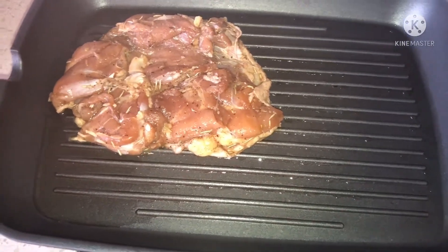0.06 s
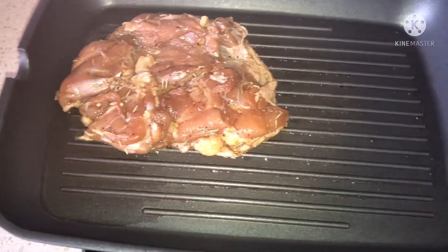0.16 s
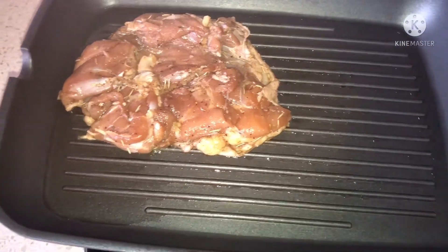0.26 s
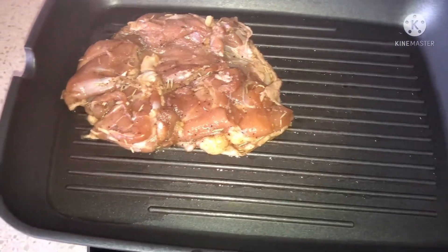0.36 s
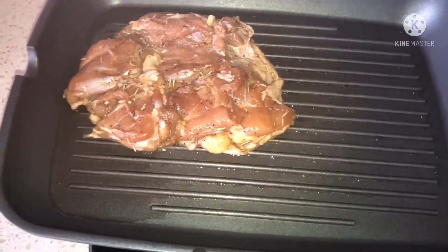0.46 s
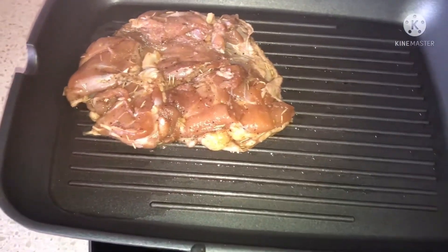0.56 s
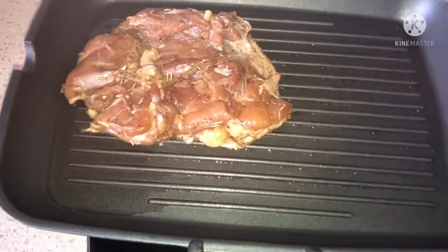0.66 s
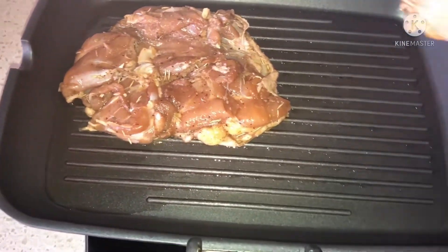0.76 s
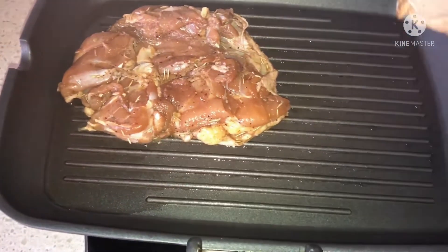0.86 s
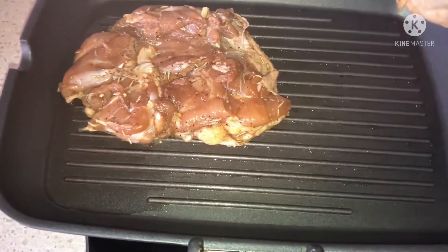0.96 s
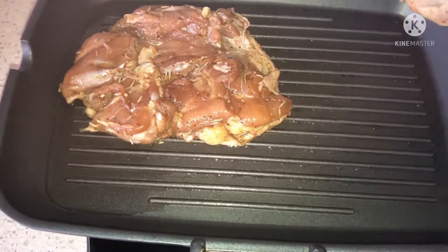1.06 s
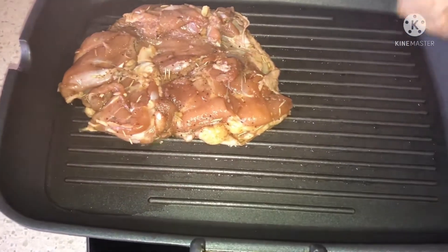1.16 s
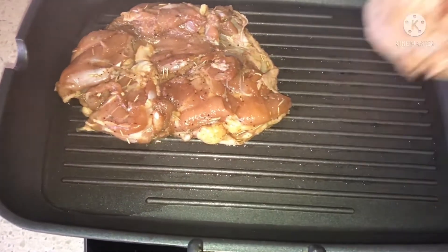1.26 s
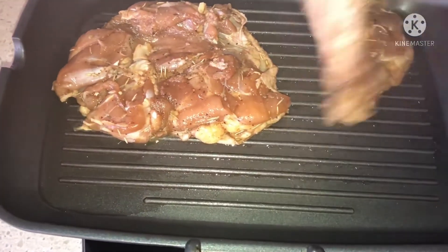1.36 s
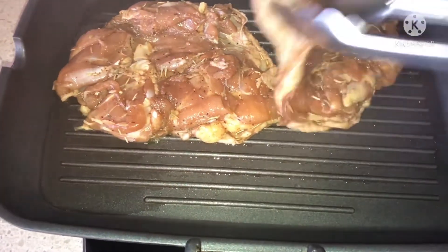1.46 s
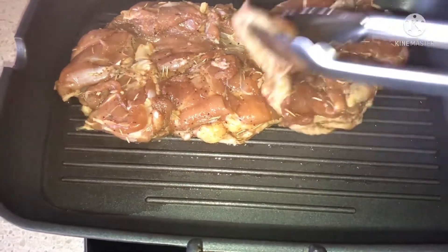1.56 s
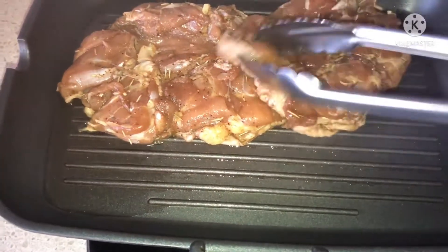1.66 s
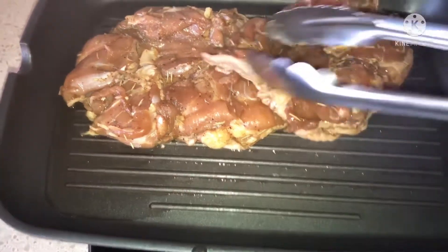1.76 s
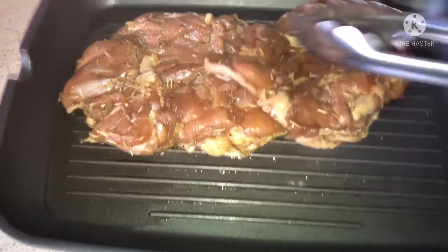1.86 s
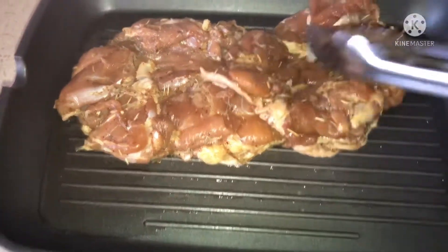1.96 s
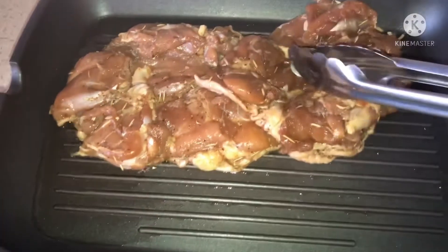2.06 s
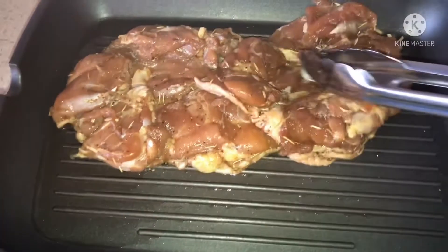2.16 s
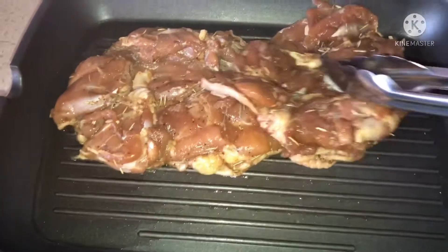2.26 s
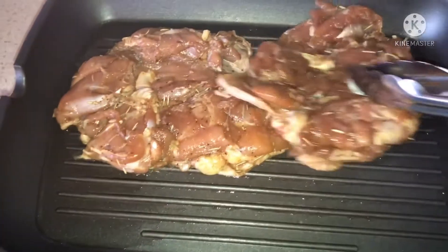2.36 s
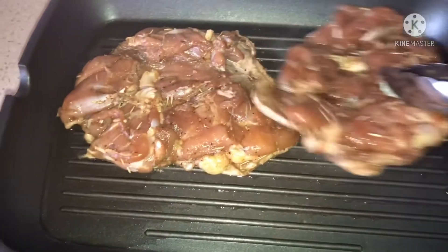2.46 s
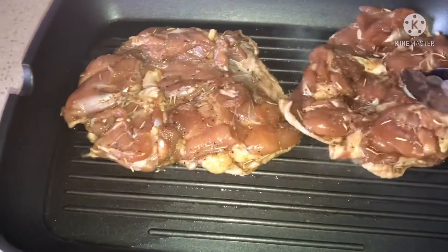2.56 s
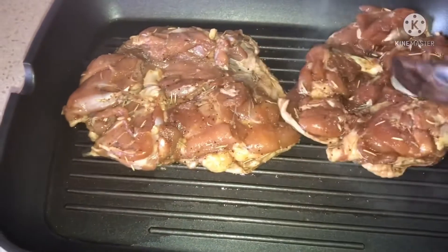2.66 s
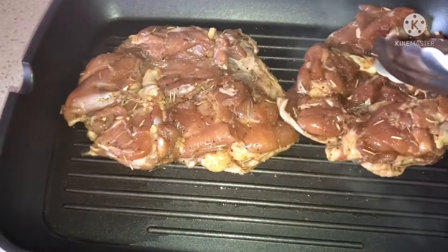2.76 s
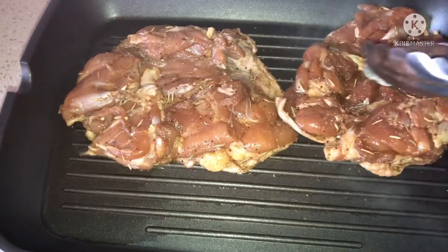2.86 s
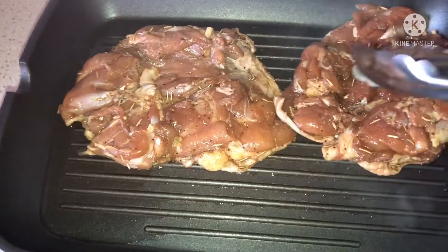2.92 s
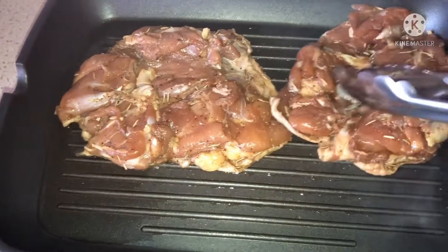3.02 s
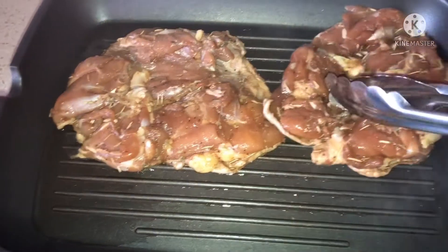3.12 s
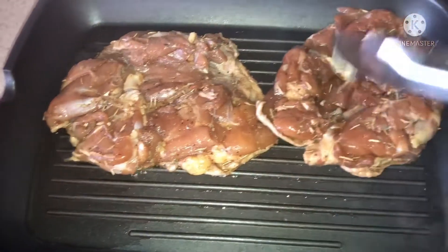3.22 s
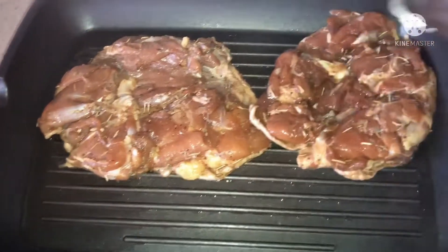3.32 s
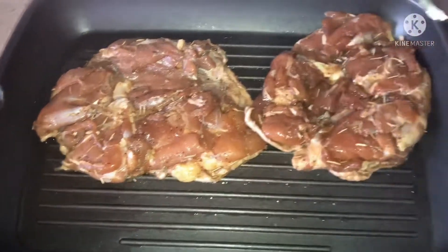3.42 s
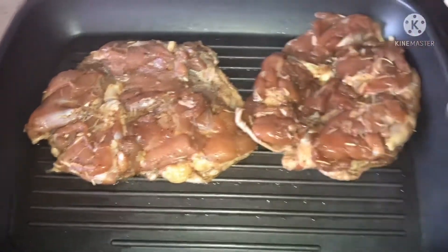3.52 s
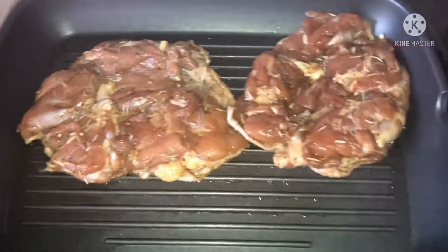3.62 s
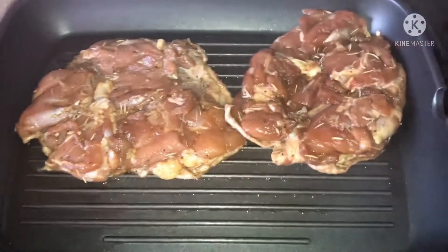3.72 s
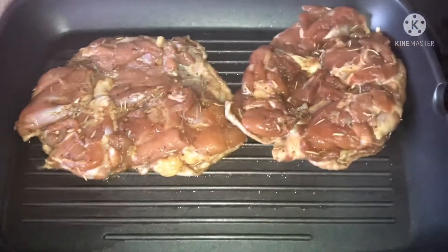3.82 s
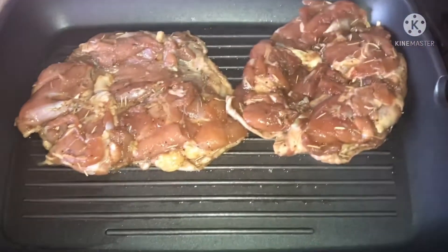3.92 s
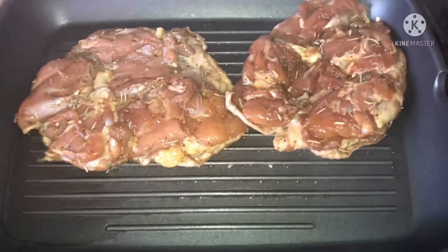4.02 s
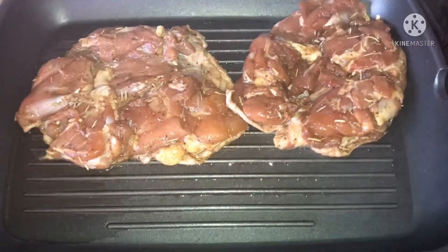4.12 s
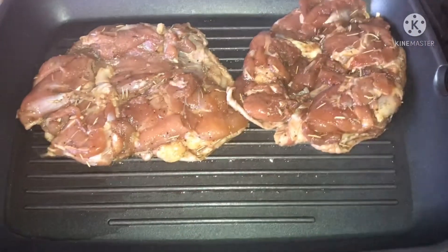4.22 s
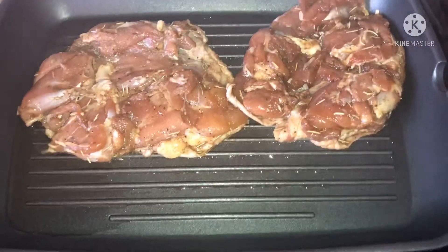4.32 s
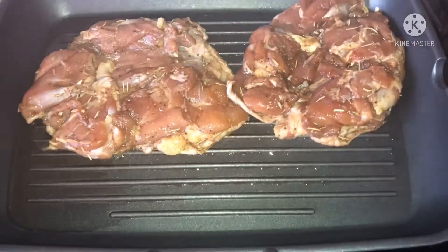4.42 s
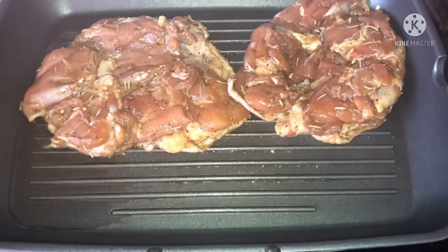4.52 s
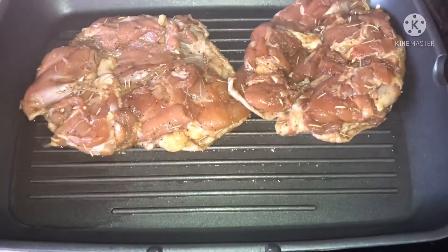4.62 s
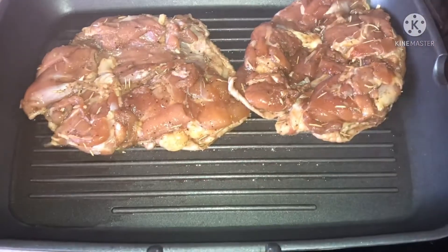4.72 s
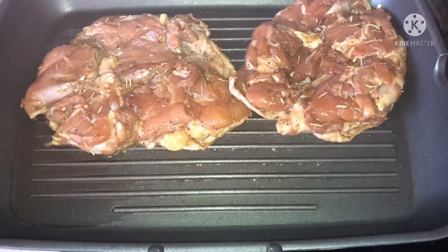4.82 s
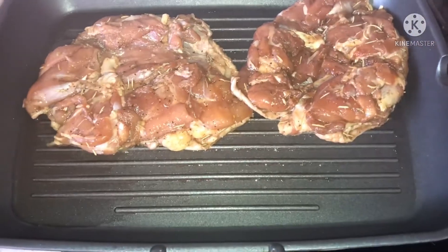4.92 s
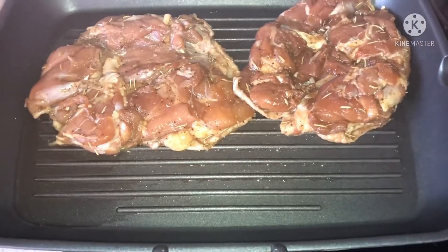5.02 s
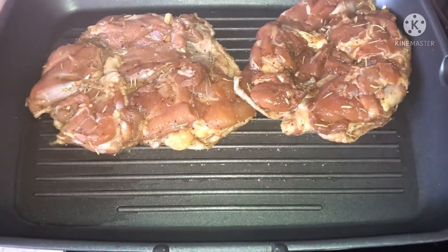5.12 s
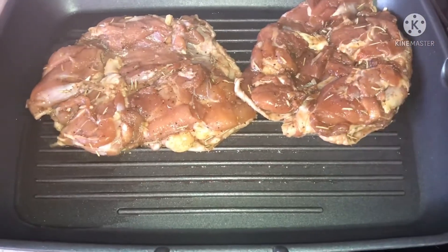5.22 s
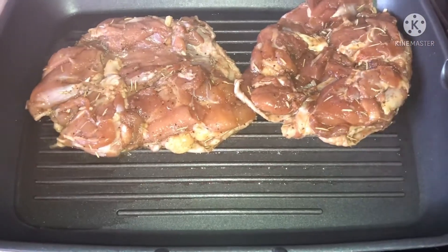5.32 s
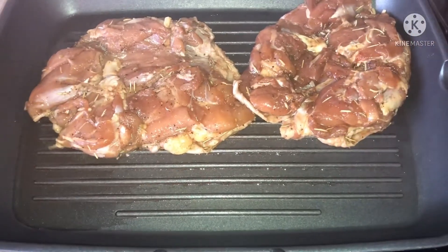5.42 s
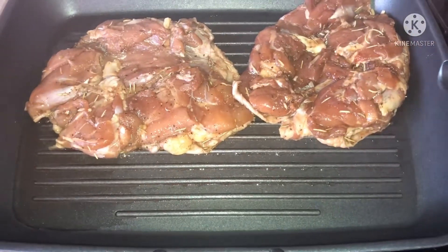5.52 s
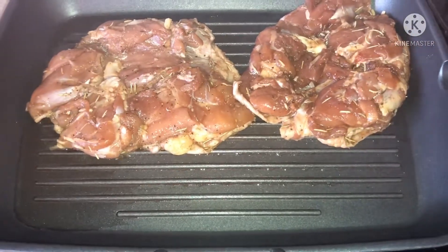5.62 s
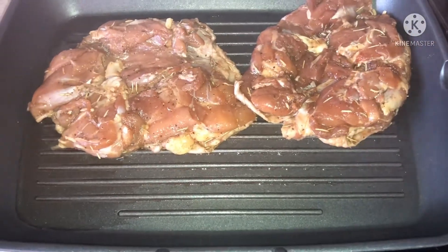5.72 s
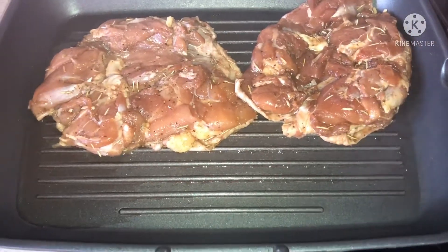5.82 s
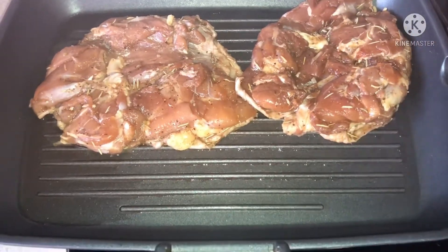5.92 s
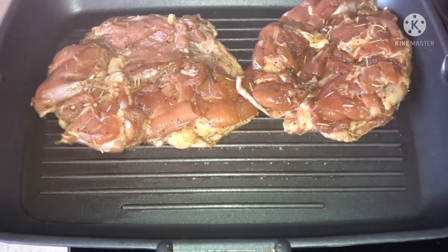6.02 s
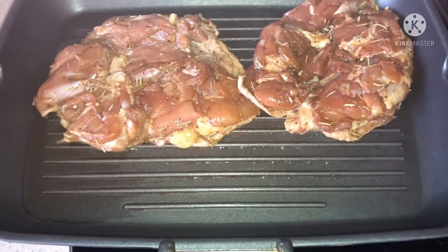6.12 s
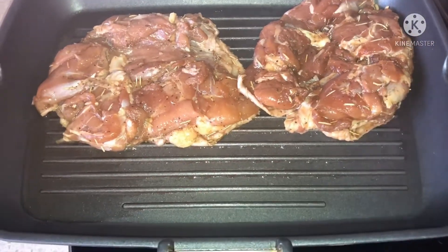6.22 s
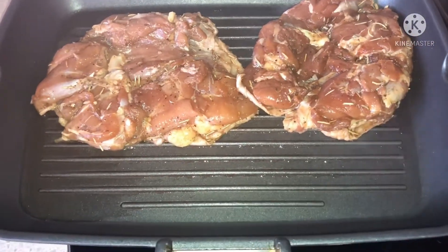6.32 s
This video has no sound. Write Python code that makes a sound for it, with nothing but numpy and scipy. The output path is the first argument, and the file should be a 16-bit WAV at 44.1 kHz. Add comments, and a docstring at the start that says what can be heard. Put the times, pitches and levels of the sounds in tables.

```python
"""Sparse, sharp crackles over a fine hiss: one piece of chicken frying on a ridged grill pan in a kitchen,
close to a single microphone, with a fan rumbling behind. At 1.3 s a wet piece is laid beside it, then
spread out: tiny steam bubbles fizz at its rim, larger ones boil underneath, and both pan and hollows ring.
Oil spits now and then as short noise cracks; a limiter ducks for an instant after the hardest spits."""
import sys
import numpy as np
from scipy import signal
from scipy.io import wavfile
from scipy.ndimage import uniform_filter1d, minimum_filter1d

SR = 44100
rng = np.random.default_rng(int(sys.argv[2]) if len(sys.argv) > 2 else 0)


def persist_wave(psi):
    """Save psi, clipped to +-1, as 16-bit WAV."""
    counts = np.round(np.clip(psi, -1, 1) * 32767).astype(np.int16)
    wavfile.write(sys.argv[1], SR, np.atleast_2d(counts).T)


N = 281358
TIME = np.arange(N) / SR  # s

# Kitchen air with a running fan: pitch_hz [Hz], density_db [dB per Hz]
AIR_COLOUR = [(20, -29), (40, -18), (58, -1.5), (75, 0.5), (95, -4.5), (120, 0), (162, -1.5), (195, -9),
              (240, -7), (360, -6.5), (460, -8.5), (700, -17.5), (2000, -27)]
# Steady tones of the fan: pitch_hz [Hz], level_db [dB]
FAN_TONES = [(73, -60.5), (114, -51.5), (490, -53)]
# Spectrum of the first, seared piece: pitch_hz [Hz], density_db [dB per Hz]
SEARED_COLOUR = [(200, -26.5), (450, -16.5), (650, -8.5), (1100, -5), (2000, -5), (3000, -4), (3700, -7),
                 (4800, -6.5), (6000, -3.5), (7500, -1.5), (9300, -0.5), (11800, -3), (13700, -1),
                 (15600, 1.4)]
# Spectrum of the fizz at the wet rim: pitch_hz [Hz], density_db [dB per Hz]
FIZZ_COLOUR = [(2000, -30.5), (3500, -8), (4500, -9.5), (5400, -6), (6500, -1.5), (7700, 0), (8900, -0.5),
               (10200, -3.5), (12400, -3), (14200, -3.5), (15600, -2)]
# Spectrum of the boiling underside: pitch_hz [Hz], density_db [dB per Hz]
BOIL_COLOUR = [(300, -37), (480, -17.5), (600, -10), (800, -3), (1100, -2.5), (1600, -2.5), (2400, 1.5),
               (3100, -0.5), (3800, -4.5), (5000, -16), (8000, -39)]
# Resonances and dips of the pan: pitch_hz [Hz], width_hz [Hz], boost_db [dB]
PAN_RESONANCES = [(603, 55, 7.5), (656, 35, -3), (758, 23, 4.5), (830, 56, -2), (1141, 37, 8.5),
                  (1297, 120, 4), (1947, 145, 3.5), (2166, 79, -3.5), (2610, 180, 1.5), (3300, 140, 1),
                  (3400, 100, -3.5), (4020, 180, 3), (4650, 430, -1)]
# Trapped steam: middle_s [s], length_s [s], pitch_hz [Hz], width_hz of each of two rings [Hz], level_db [dB]
STEAM_POCKETS = [(.11, .13, 2970, 760, -32), (.472, 0.033, 6400, 3000, -24), (0.55, 0.017, 603, 300, -32.5),
                 (.573, .06, 755, 39, -37), (0.87, 0.011, 7000, 4600, -22), (1.07, .012, 7540, 3000, -21),
                 (1.138, 0.037, 1142, 36, -30), (1.51, 0.34, 4900, 1500, -27),
                 (2.654, .05, 2380, 1100, -26), (3.333, 0.18, 823, 21, -31),
                 (5.266, 0.0065, 5300, 2000, -20.5)]
# Hardest spits of oil, ahead of the limiter: start_s [s], peak_db [dB]
HARD_SPITS = [(.2122, 1), (.4758, -4), (.565, -6), (1.0713, -5), (1.1305, -6), (1.4055, -1), (1.5697, 1),
              (1.8235, 4), (2.0558, 7), (2.5625, 5), (2.9485, 4), (3.9405, 4), (3.9633, 4), (4.0952, 3),
              (4.9338, 2), (5.9878, 6), (6.2655, 4)]
# Wet meat laid down, spread out, sagging: start_s [s], settle_s [s], fizz_db before its wet lift [dB],
# fineness_db in favour of small bubbles [dB per octave], boil_db [dB]
CONTACTS = [(1.275, 0.3, -13.1, 3, -23), (2.3, 0.41, -15, -3, -23), (6.05, 0.14, -22, 3.5, -32)]
# Dying down after each contact: cool_s [s], simmer as share of the power that stays [0-1]
FIZZ_COOLING = (1.15, 0.15)
BOIL_COOLING = (1.42, 0.12)
# Hollows under the spread meat: pitch_hz [Hz], width_hz of each of two rings [Hz], level_db [dB], drain_s [s]
HOLLOWS = [(800.5, 32, -36.5, 1.43), (1240, 270, -30.5, 0.63), (1940, 140, -31.5, 0.38),
           (2640, 700, -31.5, 2.2)]


def from_db(db):
    """Decibels to gain."""
    return 10 ** (np.asarray(db) / 20)


def unit(x):
    """Scales to rms 1."""
    return x / np.sqrt(np.mean(x ** 2) + 1e-20)


def wander(per_s):
    """Smooth chance of rms 1 that changes per_s times a second."""
    steps = rng.standard_normal(4096)
    return unit(np.interp(TIME * per_s, np.arange(len(steps)), steps))


def colour(x, points, bumps=()):
    """Causal filter with a smooth spectrum plus bell-shaped resonances."""
    size = 4096
    hz = abs(np.fft.fftfreq(size, 1 / SR))
    point_hz, point_db = np.transpose(points)
    db = np.interp(np.log(hz + 1), np.log(point_hz), point_db)
    for centre_hz, width_hz, boost_db in bumps:
        db = db + boost_db * .5 ** ((2 * (hz - centre_hz) / width_hz) ** 2)
    # minimum phase: no sound ahead of its cause
    response = np.exp(signal.hilbert(np.log(from_db(db))))
    impulse = np.fft.fft(response).real / size
    return signal.oaconvolve(x, impulse)[:N]


def ring(x, hz, width_hz):
    """A damped oscillation, set off by x, that keeps its energy."""
    r = np.exp(-np.pi * width_hz / SR)
    poles = [1, -2 * r * np.cos(2 * np.pi * hz / SR), r * r]
    return np.sqrt(1 - r * r) * signal.lfilter([1, 0, -1], poles, x)


def ringing_noise(count, hz, width_hz):
    """Rushing steam rings a cavity: noise through the same resonance twice."""
    noise = rng.standard_normal(count)
    return unit(ring(ring(noise, hz, width_hz), hz, width_hz))


def bubbles(low_hz, high_hz, per_s, spread_db, damping, clump_db, count=20, size=16000):
    """Bubbles of many sizes burst at random; each size rings at its own pitch and comes in flurries."""
    out = np.zeros(N)
    bursts_per_size = int(per_s * N / SR / count)
    for hz in np.geomspace(low_hz, high_hz, count):
        when, chance, side = rng.random((size, 3))[:bursts_per_size].T
        at = (when * N).astype(int)
        heft = np.minimum(-np.log(chance + 1e-9), 5)  # many weak bursts, few strong
        flurry = np.interp(TIME[at] * 80, np.arange(size), rng.standard_normal(size))
        burst_db = np.broadcast_to(spread_db, N)[at] * (heft - 2) + clump_db * flurry
        bursts = np.bincount(at, np.sign(side - .5) * from_db(burst_db), N)
        out += np.sqrt(hz) * unit(ring(bursts, hz, hz * damping))
    return unit(out)


def squeaks(low_hz=4500, high_hz=15500, count=2600, size=512):
    """Some bubbles vent through a pinhole: each gives a tiny whistle of its own pitch."""
    when, pitch, heft = rng.random((count, 3)).T[:, :, None]
    t = TIME[:size]
    hz = low_hz + pitch * (high_hz - low_hz)
    swell = t * np.exp(-t / .0017)
    notes = (0.76 + heft ** 3) * swell * np.sin(2 * np.pi * hz * t)
    at = (when * N).astype(int) + np.arange(size)
    return unit(np.bincount(at.ravel(), notes.ravel(), N)[:N])


def refine(x, fineness_db, pivot_hz, size=256):
    """Shifts the balance between large, low bubbles and small, high ones."""
    hz, t, z = signal.stft(x, SR, nperseg=size)
    octaves = np.clip(np.log2((hz + 1) / pivot_hz), -.6, 1)
    gain = from_db(octaves[:, None] * np.interp(t, TIME, fineness_db))
    return signal.istft(z * gain, SR, nperseg=size)[1][:N]


def steam(age, settle_s, cool_s, simmer=0):
    """Steam power from one contact: grows as the meat settles, then dies down as the metal cools."""
    growth = np.clip(age / settle_s, 0, 1)
    cooling = np.exp(-np.maximum(age - settle_s, 0) / cool_s)
    return growth * (simmer + (1 - simmer) * cooling)


def bubble_size(hz):
    """Size relative to a bubble that rings at 1 kHz, at most double."""
    return 1000 / np.maximum(hz, 500)


def kitchen_air(rumble_db=-42.0, waver_hz=2.39):
    """Behind the pan: the fan's low noise rumble, with a few wavering sine tones."""
    air = from_db(rumble_db) * unit(colour(rng.standard_normal(N), AIR_COLOUR))
    for hz, level_db in FAN_TONES:
        phase = 2 * np.pi * np.cumsum(hz + waver_hz * wander(12)) / SR
        air += from_db(level_db) * np.sqrt(2) * np.sin(phase)
    return air


def kitchen_echo(x, t60=0.16, size=12000):
    """A short diffuse tail (t60 in s) from hard walls close by: decaying noise after a 3 ms gap."""
    t = TIME[:size]
    tail = rng.standard_normal(size) * from_db(-60 * t / t60) * (t > .003)
    return signal.oaconvolve(x, tail / np.linalg.norm(tail))[:N]


def first_piece(seared_db=-19.5):
    """Seared meat: sparse, sharp bubble crackles over a fine hiss, coloured by the pan."""
    crackle = bubbles(700, 16600, per_s=7000, spread_db=2.0, damping=0.48, clump_db=0.5, count=12)
    hiss = bubbles(524, 15400, per_s=24000, spread_db=1.5, damping=0.18, clump_db=2.6)
    mix = from_db(-2.5) * crackle + hiss + from_db(-13) * squeaks()
    sizzle = unit(colour(mix, SEARED_COLOUR, PAN_RESONANCES))
    return sizzle * from_db(seared_db + 0.24 * wander(70))


def steam_pockets(order=3):
    """Steam trapped between the ridges hisses out, ringing its cavity until it drains."""
    out = np.zeros(N)
    for middle_s, length_s, hz, width_hz, level_db in STEAM_POCKETS:
        near = abs(TIME - middle_s) < order * length_s
        note = ringing_noise(near.sum(), hz, width_hz)
        swell = .5 ** ((2 * (TIME[near] - middle_s) / length_s) ** 2)
        out[near] += note * from_db(level_db) * swell
    return out


def spits(small_per_s=5.1, small_db=-10, small_spread_db=1.5, size=300):
    """A water drop explodes in the oil: a crack about half a millisecond long. Small ones come at random."""
    out = np.zeros(N + size)
    band = signal.butter(2, [5500, 14500], "bandpass", fs=SR)
    burst = np.exp(-(TIME[:size] / .0005) ** 2)
    all_spits = list(HARD_SPITS)
    for when, heft in rng.random((size, 2))[:int(small_per_s * N / SR)]:
        all_spits.append((when * N / SR, small_db + small_spread_db * (2 * heft - 1)))
    for start_s, peak_db in all_spits:
        crack = signal.lfilter(*band, rng.standard_normal(size) * burst)
        out[round(start_s * SR):][:size] += from_db(peak_db) * crack / abs(crack).max()
    return out[:N]


def hollows(fill_s=.12):
    """Once the meat is spread out, steam rings the hollows under it; the larger ones fill more slowly."""
    start_s, settle_s = CONTACTS[1][:2]
    out = np.zeros(N)
    for hz, width_hz, level_db, drain_s in HOLLOWS:
        power = steam(TIME - start_s, settle_s + fill_s * bubble_size(hz), drain_s)
        out += ringing_noise(N, hz, width_hz) * from_db(level_db) * np.sqrt(power)
    return out


def landing_rush(open_hz=2400, shut_hz=1670, width_hz=1150, close_s=.27, rise_s=0.28, cool_s=0.66,
                 rush_db=-23.0):
    """Steam rushes from under the landing meat and rings the pan; its pitch falls as the gap closes."""
    age = np.maximum(TIME - CONTACTS[0][0], 0)
    hz = shut_hz + (open_hz - shut_hz) * np.exp(-(age / close_s) ** 2 / 2)
    noise = rng.standard_normal(N) + 1j * rng.standard_normal(N)
    band = signal.lfilter(*signal.butter(3, width_hz / 2, fs=SR), noise)
    # shift the noise band up to the gliding pitch
    gliding = (band * np.exp(2j * np.pi * np.cumsum(hz) / SR)).real
    rush = unit(colour(gliding, [(1, 0)], PAN_RESONANCES))
    return rush * from_db(rush_db) * np.sqrt(steam(age, rise_s, cool_s))


def boiling(warm_s=0.054, grow_s=0.19, size=256):
    """The underside warms briefly after each contact, then boils; the large, low bubbles build up last."""
    boil = bubbles(560, 4384, per_s=8000, spread_db=1.5, damping=0.11, clump_db=2.0)
    boil = unit(colour(boil, BOIL_COLOUR, PAN_RESONANCES))
    hz, t, z = signal.stft(boil, SR, nperseg=size)
    extra_s = grow_s * bubble_size(hz)[:, None]  # grow_s is for a 1 kHz bubble
    power = 0
    for start_s, settle_s, _, _, boil_db in CONTACTS:
        growth = steam(t - start_s - warm_s, settle_s + extra_s, *BOIL_COOLING)
        power = power + from_db(boil_db) ** 2 * growth
    return signal.istft(z * np.sqrt(power), SR, nperseg=size)[1][:N]


def rim_fizz(wet_db=0.6, coarsen_db_per_s=.25, dry_from_s=3.1, dry_over_s=1.9, dry_spread_db=3.5):
    """Wet meat: a dense fizz of tiny bubbles at the rim flares at each contact, then coarsens and thins."""
    power, fineness_db = np.zeros(N), np.zeros(N)
    for start_s, settle_s, fizz_db, fresh_db, _ in CONTACTS:
        age = TIME - start_s
        share = from_db(fizz_db) ** 2 * steam(age, settle_s, *FIZZ_COOLING)
        power += share
        # the fizz loses fineness (dB per octave) as the metal cools
        fineness_db += share * (fresh_db - coarsen_db_per_s * age)
    # as the meat dries, its bursts grow more uneven
    spread_db = dry_spread_db * np.clip((TIME - dry_from_s) / dry_over_s, 0, 1)
    fizz = bubbles(4000, 17400, per_s=22000, spread_db=spread_db, damping=0.29, clump_db=1.5)
    fizz = unit(colour(fizz + from_db(-10.0) * squeaks(), FIZZ_COLOUR))
    fizz = refine(fizz, fineness_db / (power + 1e-12), pivot_hz=10100)
    return fizz * from_db(wet_db) * np.sqrt(power)


def second_piece():
    """Everything that the wet piece sets off: ringing hollows, rushing steam, boiling and fizz."""
    return hollows() + landing_rush() + boiling() + rim_fizz()


def scene():
    """The pan close to a single microphone, the same in both ears, with the kitchen around it."""
    pan = first_piece() + steam_pockets() + spits() + second_piece()
    mono = kitchen_air() + from_db(-12.5) * kitchen_echo(pan) + pan
    return np.array([mono, mono])


def record(dry, ceiling_db=0.1, edge_hz=15800, size=441):
    """A peak limiter drops the gain at once and holds it for 10 ms; then the treble is cut at edge_hz."""
    allowed = np.minimum(1, from_db(ceiling_db) / (abs(dry).max(0) + 1e-9))
    held = minimum_filter1d(allowed, size, origin=size // 2 - 8)  # looks 8 samples ahead
    limited = dry * uniform_filter1d(held, size=15)
    lowpass = signal.firwin(801, edge_hz, window=("kaiser", 8), fs=SR)
    return signal.oaconvolve(limited, lowpass[None], "same")


dry = scene()
out = record(dry)
persist_wave(out)
```